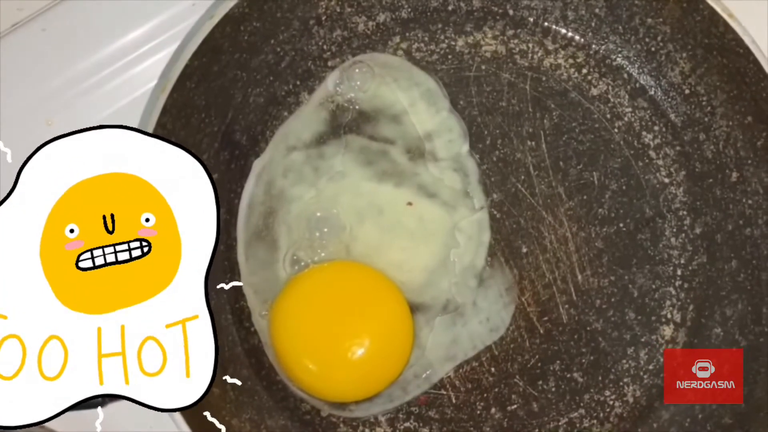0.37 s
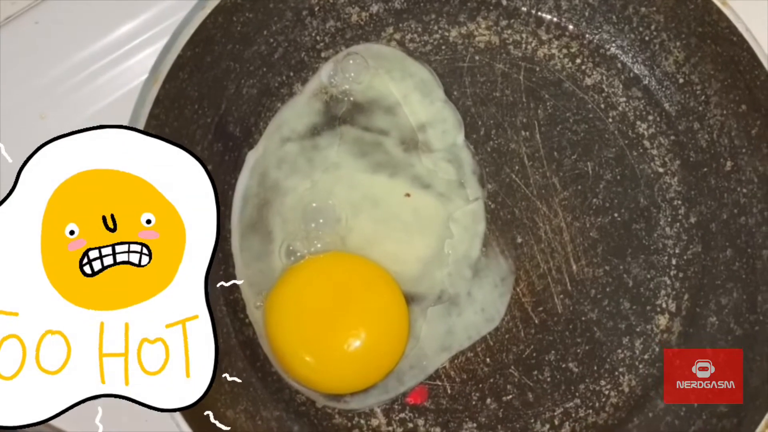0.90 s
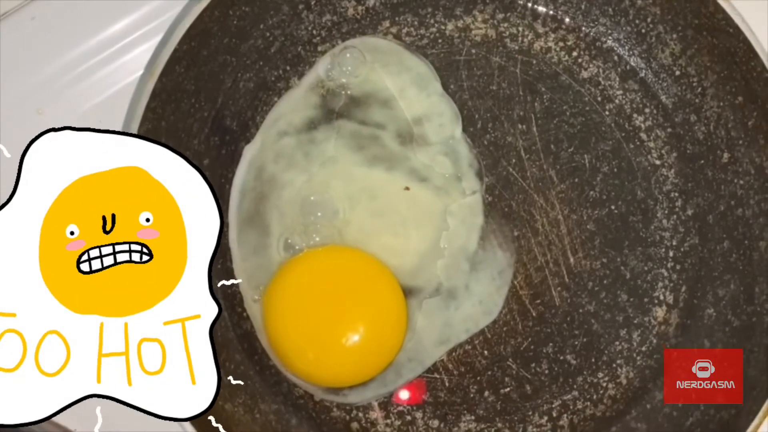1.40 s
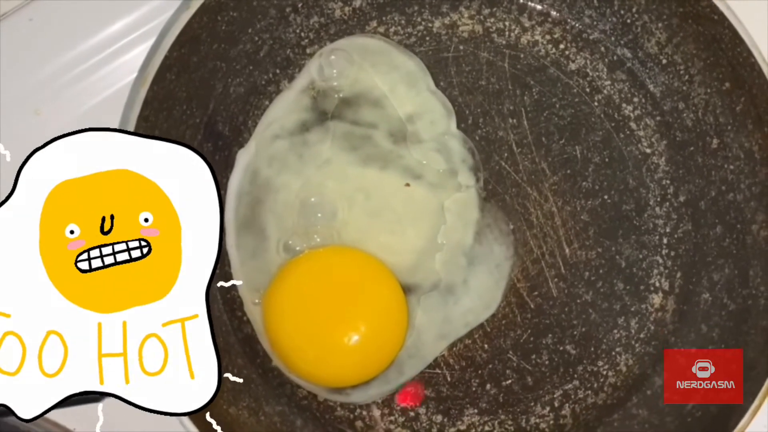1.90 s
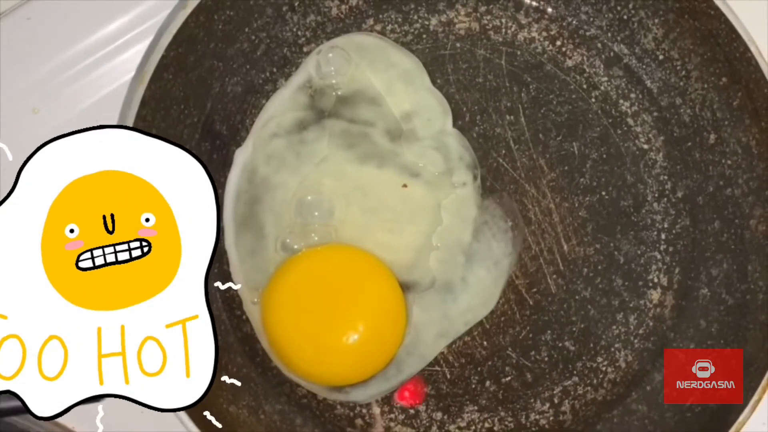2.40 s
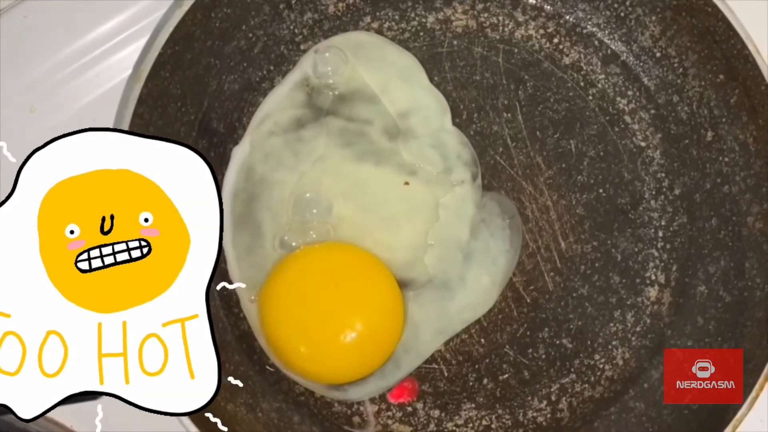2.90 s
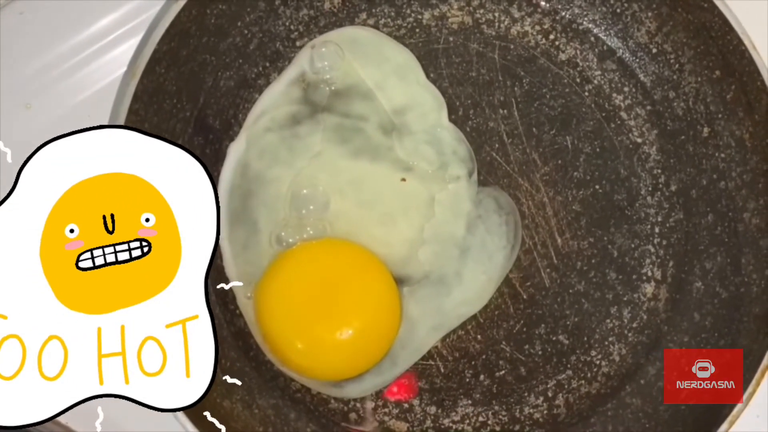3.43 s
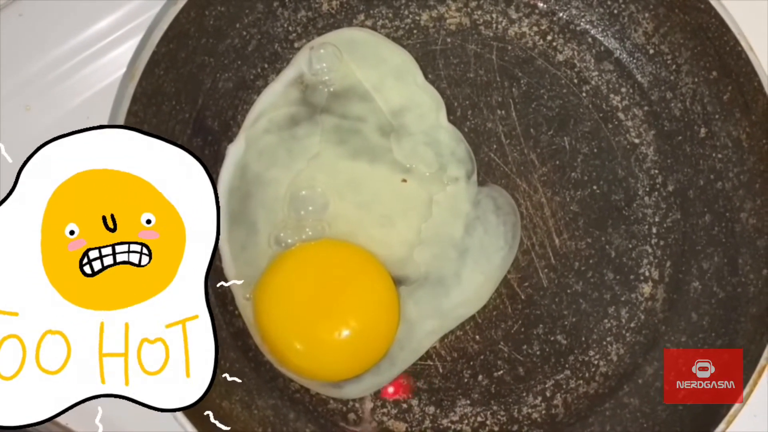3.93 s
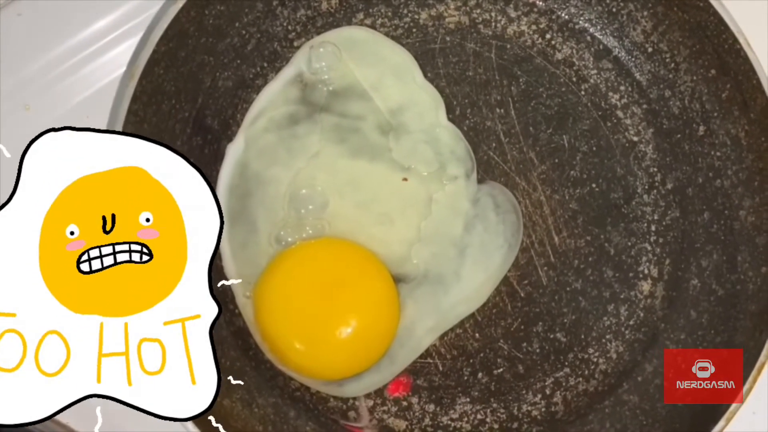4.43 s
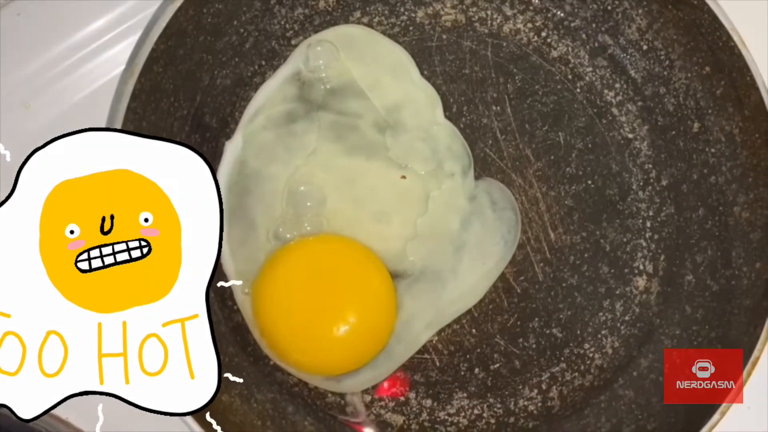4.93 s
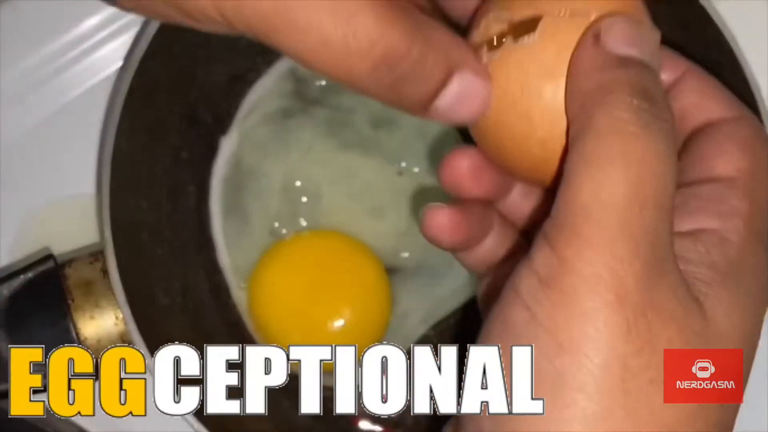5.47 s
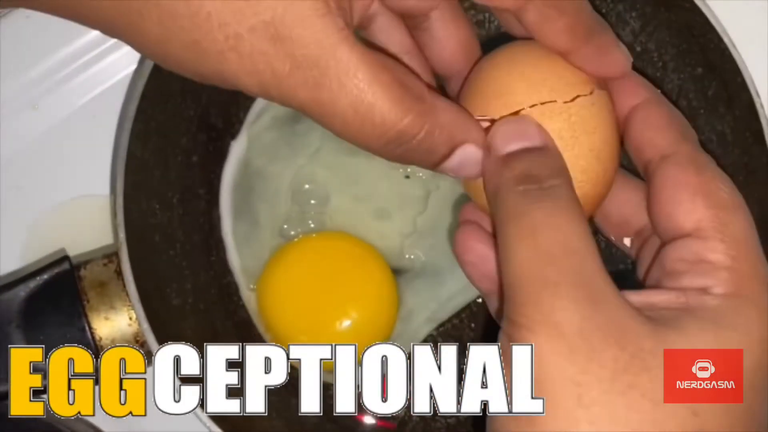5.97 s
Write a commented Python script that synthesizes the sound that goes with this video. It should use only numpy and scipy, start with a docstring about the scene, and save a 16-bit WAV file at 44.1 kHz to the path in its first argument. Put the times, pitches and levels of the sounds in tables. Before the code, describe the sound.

Low appliance hum, sparse crackles of frying egg, and three crisp eggshell taps on the pan midway, followed by tiny creaks and ticks.

```python
"""An appliance hums in a quiet kitchen (wavering sines) over airy rumble (shaped noise).
An egg sizzles faintly in surges (fluttering hiss) and spits now and then (damped noise bursts).
An eggshell is knocked three times on the pan rim, the last time as a close double strike: crunch,
pan modes, crack and chips. A soft bump and two faint squeaks are heard too; the small room rings
after the hits. The right channel is turned in phase against the left, which widens the picture."""
import sys
import numpy as np
from scipy import signal
from scipy.fft import rfft, irfft, next_fast_len
from scipy.io import wavfile
from scipy.ndimage import uniform_filter1d

SR = 44100
rng = np.random.default_rng(int(sys.argv[2]) if len(sys.argv) > 2 else 0)


def magnitude_from_level(level_db):
    """Linear magnitude for a level in decibels (20 dB per decade)."""
    exponent = np.asarray(level_db, float) / 20
    return 10 ** exponent


def log_audio(samples):
    """Write samples as a 16-bit WAV file to the path given in sys.argv[1]."""
    # one column per channel
    frames = np.atleast_2d(samples).T
    # limit to full scale, then quantise
    limited = np.clip(frames, -1, 1)
    pcm = np.round(limited * 32767).astype(np.int16)
    wavfile.write(sys.argv[1], SR, pcm)


N = 268348

# left-right likeness of noise and room tail: freq_hz, likeness (-1 to 1)
LIKENESS = [(100, 1), (300, 0.58), (550, 0.12), (1200, 0.5), (2500, 0.61), (4500, 0.06), (6000, 0.86),
            (7400, 1), (15000, 0.69)]


def evened(x):
    """Scales to rms 1."""
    return x / np.sqrt(np.mean(x ** 2) + 1e-20)


def read(points, hz):
    """Interpolates a table of values on a log-frequency axis."""
    freq_hz, value = np.transpose(points)
    return np.interp(np.log(hz + 1), np.log(freq_hz + 1), value)


def add(mix, start_s, sound):
    """Mixes a sound in at its start time, cut off at the end of the mix."""
    part = mix[round(start_s * SR):][:len(sound)]
    part += sound[:len(part)]


def drift(knots_per_s):
    """Slow random wander: unit-variance normal knots joined by straight lines."""
    return np.interp(np.arange(N) / SR * knots_per_s, np.arange(1000), rng.standard_normal(1000))


def alike(hz):
    """Left-right likeness per frequency, and the share of independent sound that completes it."""
    same = np.clip(read(LIKENESS, hz), -1, 1)[:, None]
    return same, np.sqrt(1 - same ** 2)


def noise(spectrum, size, patchy_db):
    """Two partly alike noise channels, shaped by a dB spectrum, with patches drifting in time and pitch."""
    frames, hz = 4 * N // size + 5, np.fft.rfftfreq(size, 1 / SR)
    a, b, c, d, patches = rng.standard_normal((frames, len(hz), 5)).T
    patches = uniform_filter1d(patches, size=8, axis=0)
    patches = evened(uniform_filter1d(patches, size=10, axis=1))
    same, other = alike(hz)
    left = a + 1j * b
    z = np.array([left, same * left + other * (c + 1j * d)])
    z *= magnitude_from_level(read(spectrum, hz)[:, None] + patchy_db * patches) * np.sqrt(SR / size)
    return signal.istft(z, nperseg=size, noverlap=3 * size // 4)[1][:, :N]


def coloured(x, spectrum):
    """Filters by a dB spectrum with minimum phase, so nothing sounds before its cause."""
    log_gain = read(spectrum, abs(np.fft.fftfreq(4096, 1 / SR))) * np.log(10) / 20
    taps = np.fft.ifft(np.exp(np.conj(signal.hilbert(log_gain)))).real[:2048]
    return signal.fftconvolve(x, taps)[:len(x)]


def blow(level_db, fullness_db, hardness_db):
    """Shell crunches for a few milliseconds, shakes the pan's damped modes, cracks and crumbles."""
    # pan and stove-top modes: freq_hz, relative_db, t60_s
    pan = [(66.5, -8, 0.34), (124.2, -0.5, 0.063), (182.4, 0, 0.04), (223.3, -7.5, 0.051),
           (355.6, -0.5, 0.032), (447, -6.5, 0.062), (542.5, -8, 0.067), (586.2, -2.5, 0.057),
           (722, -5.5, 0.039), (802.6, -4, 0.046), (862, -1, 0.019), (950, 7, 0.016), (1017, -1.5, 0.046),
           (1084, -6.5, 0.11), (1220, -27, 0.033), (2140, 9, 0.0063), (2452, -5, 0.052), (3100, -35, 0.064),
           (4370, -51, 0.012), (4550, -1.5, 0.01)]
    # colour of a blow: freq_hz, base_db, share_of_fullness, share_of_hardness
    knock = [(30, -46, 0, 0), (58, -9.5, 0.089, 0.77), (205, 7, 0.18, 0.4), (334, 3.5, 1, 0),
             (460, 0, 1, 0.078), (590, 5, 0.45, 0), (950, 1.5, 0.13, 0), (1234, -2.5, 0.23, 0),
             (1540, -10, 0, 0.21), (2860, -3.5, 0, 0.53), (9800, -20.5, 0.2, 0.89), (15500, -22.5, 0.38, 1),
             (17000, -63.5, 0.093, 0)]
    chips_per_s, chips_db, chips_fade_s = 1500, 0.5, 0.022
    t = np.arange(SR // 4) / SR
    crunch, crack = rng.standard_normal((2, len(t)))
    crunch = crunch * np.exp(-t / 0.0014)

    modes = np.zeros(len(t))
    for hz, mode_db, t60_s in pan:
        swell = 1 - np.exp(-t * hz / 0.96)  # builds over a cycle or so
        modes += magnitude_from_level(mode_db - 60 * t / t60_s) * swell * np.sin(2 * np.pi * hz * t)
    rattled = signal.fftconvolve(crunch / np.linalg.norm(crunch), modes)[:len(t)]

    crack_fade = magnitude_from_level(15.0) * np.exp(-t / 0.0052) + np.exp(-t / 0.024)
    cracked = crack * (1 - np.exp(-t / 0.00026)) * crack_fade
    chips = rng.standard_normal(len(t)) * (rng.random(len(t)) < chips_per_s / SR)
    crumbled = magnitude_from_level(chips_db) * chips * np.exp(-t / chips_fade_s)

    colour = [(hz, level_db + base_db + full * fullness_db + hard * hardness_db)
              for hz, base_db, full, hard in knock]
    return coloured(2.27 * modes + 1.93 * rattled + cracked + crumbled, colour)


def spit(ring_db, ring_hz, snap_db):
    """Spitting fat or creaking shell: a noise puff rings a damped resonance, with a bright snap on top."""
    # damping; wide rings are mere ticks: ring_hz, width_hz
    ring_width = [(950, 700), (1600, 1030), (2300, 1600), (3000, 4400), (4200, 5700), (5300, 4100)]
    snap_colour = [(1500, -10), (5000, -6), (10000, 2.5), (15500, -5.5), (16600, -56)]  # freq_hz, db
    t = np.arange(SR // 20) / SR
    puff, snap = rng.standard_normal((2, len(t)))
    puff = puff * (1 - np.exp(-t / 0.00031)) * np.exp(-t / 0.0051)
    snap = snap * (1 - np.exp(-t / 0.0004)) * np.exp(-t / 0.0032)
    r = np.exp(-np.pi * np.clip(read(ring_width, ring_hz), 60, 6000) / SR)
    poles = [1, -2 * r * np.cos(2 * np.pi * ring_hz / SR), r * r]
    ring = signal.lfilter([1, -1], poles, puff)
    ring = signal.lfilter([1], np.convolve(poles, poles), ring)  # three resonators in all
    return magnitude_from_level(ring_db) * ring / abs(ring).max() + magnitude_from_level(snap_db) * coloured(snap, snap_colour)


def thud(level_db):
    """A dull bump: two low damped sines with a soft start."""
    t = np.arange(SR // 10) / SR
    rise = 1 - np.exp(-(t / 0.0027) ** 2)
    tones = np.sin(2 * np.pi * 190 * t) + 0.24 * np.sin(2 * np.pi * 420 * t)
    return rise * magnitude_from_level(level_db - 60 * t / 0.042) * tones


def squeak(length_s, level_db, pitch_hz):
    """A brief soft sine under an arched envelope."""
    t = np.arange(0, length_s, 1 / SR)
    return magnitude_from_level(level_db) * np.sqrt(np.sin(np.pi * t / length_s)) * np.sin(2 * np.pi * pitch_hz * t)


def sizzle():
    """Water boils off under the egg: hiss in surges, fluttering as small bubbles burst."""
    # surges: crest_s, length_s, level_db
    surges = [(0.01, 0.061, -62.5), (0.078, 0.019, -63), (0.833, 0.027, -63.5), (1.48, 0.14, -56),
              (1.565, 0.06, -71), (1.639, 0.049, -61.5), (1.752, 0.1, -60), (1.918, 0.018, -65),
              (2.027, 0.14, -62.5), (2.21, 0.16, -74), (4.896, 0.042, -55.5)]
    # hiss colour: freq_hz, relative_db
    fizz = [(2500, -21), (3500, -4.5), (5200, -10), (7500, -2.5), (10500, -6), (13000, -9), (15600, -9),
            (16200, -30)]
    rise_share, end_drop_db = 0.3, 13.5  # part of a surge spent rising; its ends under the crest
    t, level = np.arange(N) / SR, np.zeros(N)
    for crest_s, length_s, level_db in surges:
        away = np.where(t < crest_s, (crest_s - t) / rise_share, (t - crest_s) / (1 - rise_share))
        level += magnitude_from_level(level_db - end_drop_db * away / length_s)
    flutter = magnitude_from_level(5.0 + 0.92 * drift(90))
    return level * flutter * evened(noise(fizz, size=256, patchy_db=3.3))


def hum():
    """Motor tones: sines that waver in pitch and strength."""
    # motor tones: pitch_hz, level_db (rms, before wavering)
    tones = [(48.4, -48.5), (145.3, -48.5), (199.2, -61.5), (242.2, -61), (333.8, -69), (764.4, -62.5),
             (909.8, -58.5), (1007, -67), (1195, -70), (1244, -74)]
    out = np.zeros(N)
    for k, (pitch_hz, level_db) in enumerate(tones):
        waver_db = 3.0 if 0 < k < 5 else 1.3  # lowest tone and upper tones steadier
        turns = np.cumsum(pitch_hz + 1.591 * drift(6)) / SR + rng.random()
        out += np.sqrt(2) * magnitude_from_level(level_db + waver_db * drift(16)) * np.sin(2 * np.pi * turns)
    return out


def room_air():
    """Room air and distant appliance rumble: steady shaped noise, slightly patchy."""
    # noise spectrum: freq_hz, level_db_per_hz
    air = [(30, -104), (42, -69), (70, -69), (110, -67), (160, -72), (250, -80), (400, -87), (700, -82.5),
           (1000, -88), (1500, -94), (2300, -96.5), (3500, -101.5), (6000, -105), (11000, -107.5),
           (15400, -111), (16000, -132)]
    return noise(air, size=2048, patchy_db=2.6)


def nearby(x):
    """The direct sound with its duller first reflections, unlike on the two sides."""
    # reflections off stove top and wall: delay_s, left_gain, right_gain
    early = [(.0007, 0.3, -0.19), (.0016, -0.75, 0.43), (.0031, 0.15, -0.11), (.0052, 0.15, 0.21),
             (.008, 0.25, -.2), (0.021, 0.44, 0.15)]
    out = np.array([x, x])
    dull = coloured(x, [(150, -26), (500, -1.0), (4500, -3.5), (7000, -10.0)])  # freq_hz, db
    for delay_s, *gains in early:
        out += np.outer(gains, np.roll(dull, round(delay_s * SR)))
    return out


def kitchen(x):
    """Room tail: sparse taps of random sign, each band dying at its own speed."""
    # reverberation: freq_hz, t60_s
    decay = [(100, 0.28), (300, 0.52), (800, 0.5), (2000, 0.55), (5000, 0.48), (12000, 0.34)]
    taps = np.zeros((2, SR))
    at = np.arange(160, SR - 20, 20) + rng.integers(0, 20, (2, (SR - 161) // 20))
    np.put_along_axis(taps, at, rng.choice([-1., 1.], at.shape), 1)
    hz, t, z = signal.stft(taps, SR, nperseg=256)
    same, other = alike(hz)
    z[1] = same * z[0] + other * z[1]
    z = z * magnitude_from_level(-60 * t / read(decay, hz)[:, None])
    tail = signal.istft(z, SR, nperseg=256)[1]
    return signal.fftconvolve(x[None], tail / np.linalg.norm(tail[0]), axes=1)[:, :N]


def scene():
    """Hits heard directly and through the room, over the steady layers."""
    # shell on rim: start_s, level_db, fullness_db, hardness_db
    blows = [(3.033, -17, -2, -8.5), (3.313, -16.5, -9, 2.5), (3.667, -33, 4, 10.5), (3.676, -35, 5.5, 10)]
    # spits of fat and small creaks of shell: start_s, ring_db, ring_hz, snap_db
    spits = [(0.0228, -49, 4070, -58), (0.0957, -47, 1700, -70), (0.1444, -34.5, 3240, -46),
             (0.2512, -39, 2690, -49), (0.728, -35, 3450, -66), (0.8259, -42.5, 3640, -61),
             (1.3019, -40, 4050, -29), (1.312, -41.5, 2520, -60), (1.408, -54, 5540, -47),
             (1.462, -45.5, 5350, -52), (1.8804, -55, 5240, -47.5), (2.3428, -52, 5500, -43),
             (2.6343, -29, 1530, -63), (3.754, -32, 4390, -36), (4.1628, -38.5, 2870, -49),
             (4.3887, -24, 2190, -38.5), (4.652, -45, 2930, -54), (4.814, -38.5, 2560, -54),
             (4.8983, -45.5, 3880, -45), (5.444, -55, 4740, -55), (5.454, -42.5, 4100, -51),
             (5.502, -49, 4640, -49), (5.753, -44, 950, -73), (5.7768, -29.5, 2480, -44.5),
             (5.7879, -36.5, 2110, -63), (5.8868, -49, 2310, -53), (6.024, -49.5, 3140, -67)]
    # soft bump on the counter: start_s, level_db
    thuds = [(0.273, -26)]
    # faint squeaks: start_s, length_s, level_db, pitch_hz
    squeaks = [(2.936, .06, -53.5, 2016), (5.397, 0.032, -56, 1300)]
    shell, small = np.zeros((2, N))
    for start_s, *row in blows:
        add(shell, start_s, blow(*row))
    for source, table in ((spit, spits), (thud, thuds), (squeak, squeaks)):
        for start_s, *row in table:
            add(small, start_s, source(*row))
    direct = magnitude_from_level(0.5) * nearby(small + shell)
    ringing = kitchen(magnitude_from_level(-13.0) * small + magnitude_from_level(-7.5) * shell)
    return direct + ringing + sizzle() + hum() + room_air()


def widened(dry):
    """Turns the right channel's phase by frequency, so the two sides differ."""
    # lag of the right channel: freq_hz, lag_half_turns
    lag = [(0, 0), (300, 0), (600, 1), (1800, 2), (2700, 3), (4800, 4), (7400, 5), (10500, 6), (13700, 7),
           (16200, 8)]
    size = next_fast_len(N + 4096)
    freq_hz, half_turns = np.transpose(lag)
    shift = np.exp(-1j * np.pi * np.interp(np.fft.rfftfreq(size, 1 / SR), freq_hz, half_turns))
    right = magnitude_from_level(0.7) * irfft(rfft(dry[1], size) * shift, size)[:N]
    return np.array([dry[0], right])


def low_pass(x):
    """Removes everything above the highest recorded frequency."""
    return signal.sosfilt(signal.butter(12, 16810, fs=SR, output="sos"), x)


def record(dry):
    """The recorder widens the picture and stores the finished mix."""
    mix = widened(dry)
    return low_pass(mix)


dry = scene()
out = record(dry)
log_audio(out)
```